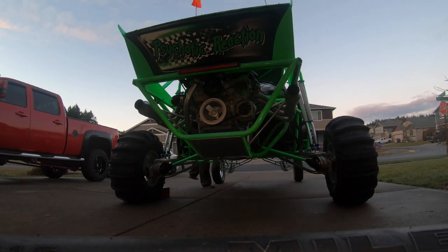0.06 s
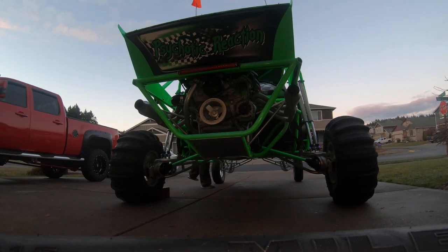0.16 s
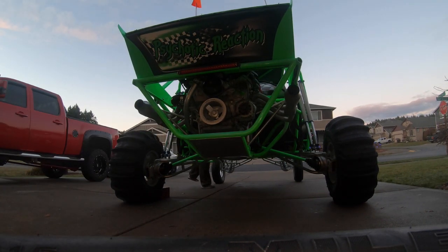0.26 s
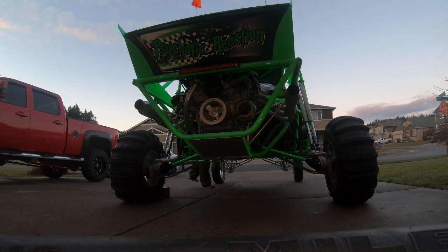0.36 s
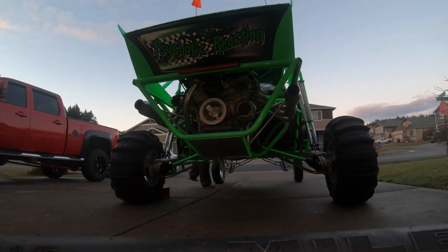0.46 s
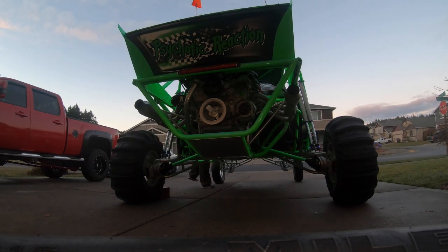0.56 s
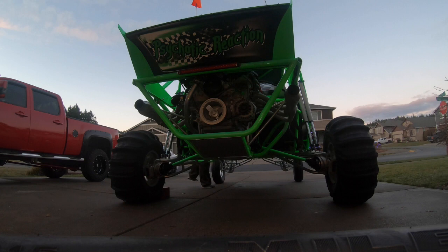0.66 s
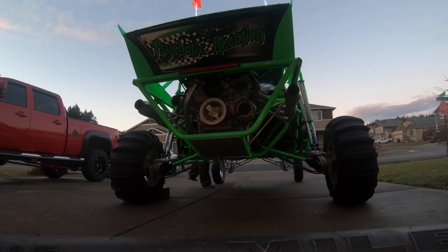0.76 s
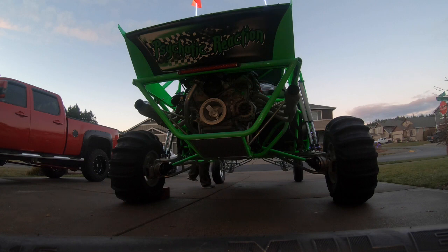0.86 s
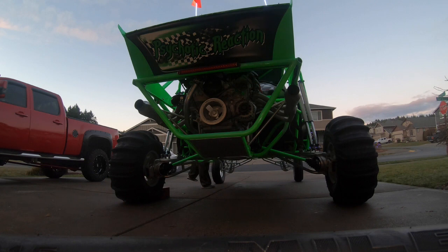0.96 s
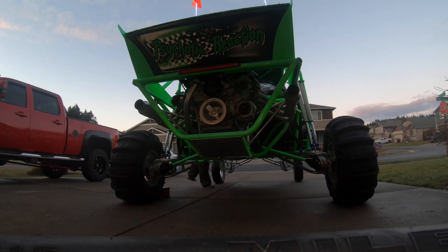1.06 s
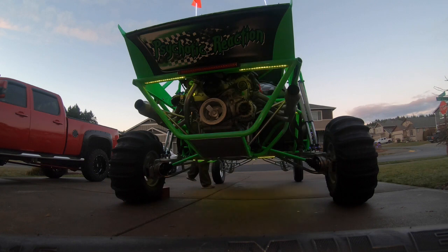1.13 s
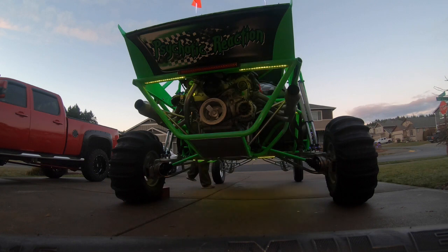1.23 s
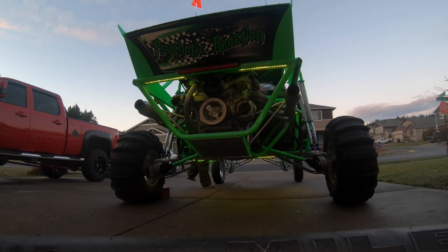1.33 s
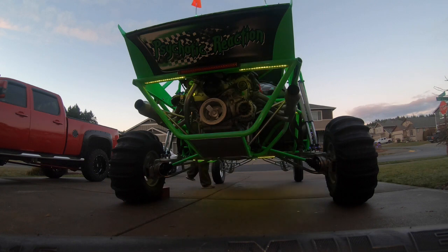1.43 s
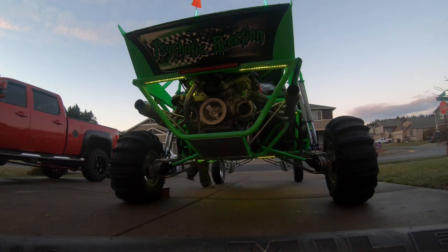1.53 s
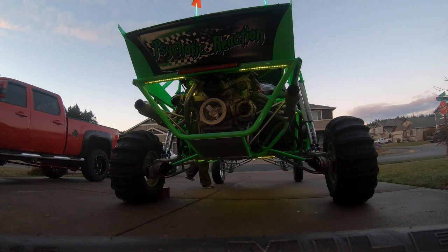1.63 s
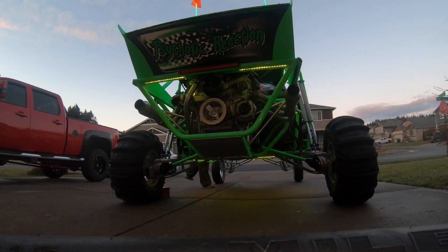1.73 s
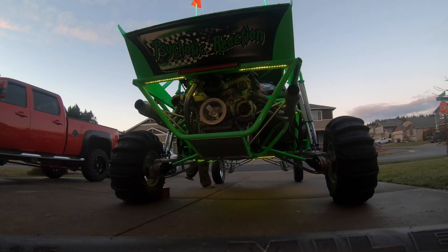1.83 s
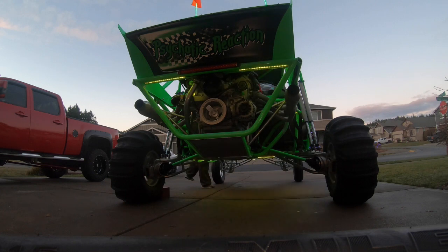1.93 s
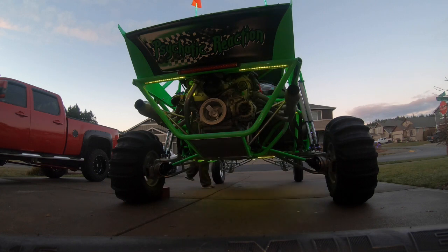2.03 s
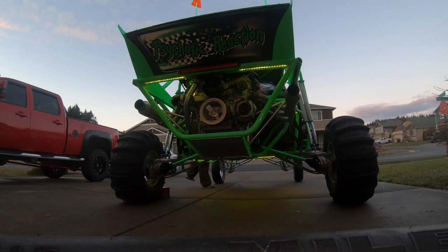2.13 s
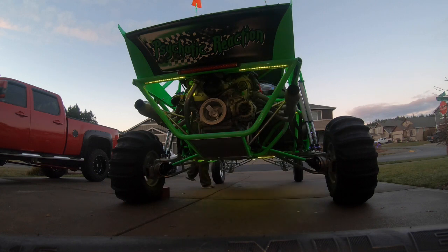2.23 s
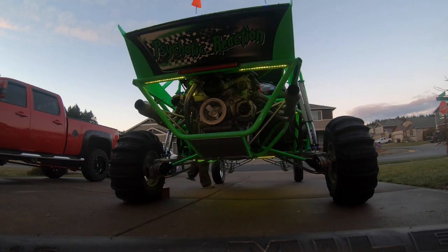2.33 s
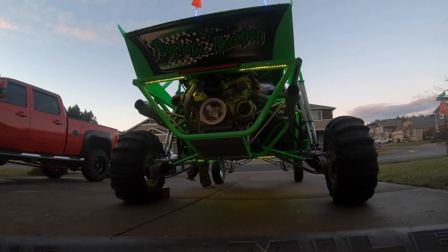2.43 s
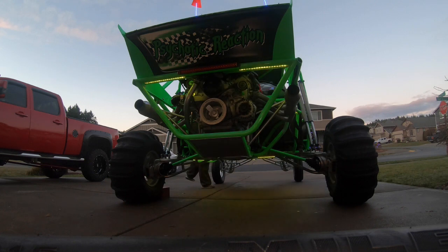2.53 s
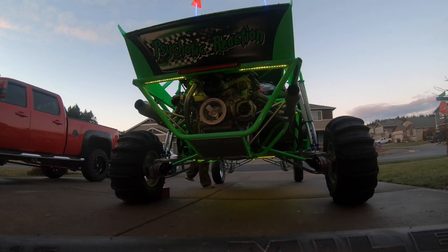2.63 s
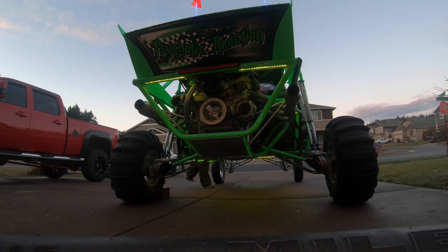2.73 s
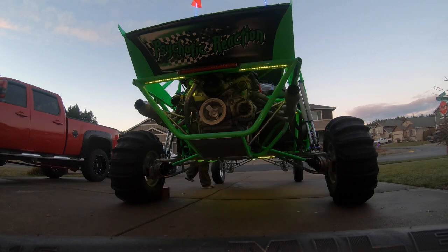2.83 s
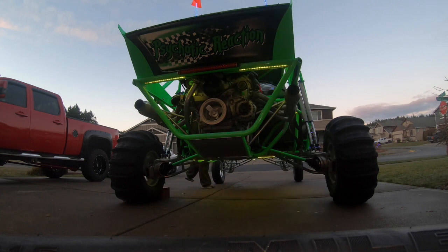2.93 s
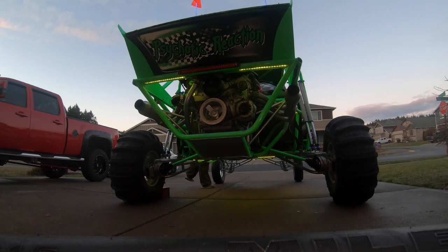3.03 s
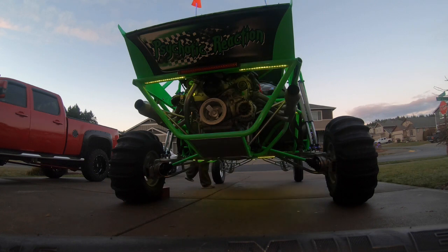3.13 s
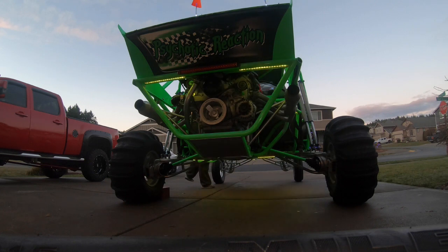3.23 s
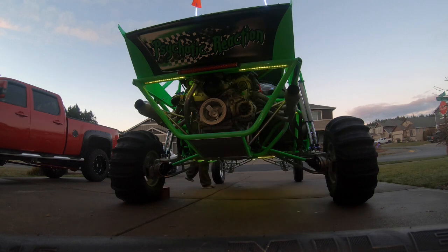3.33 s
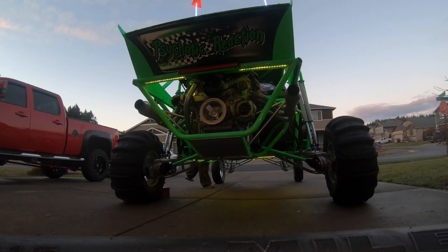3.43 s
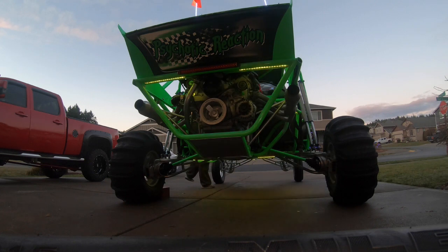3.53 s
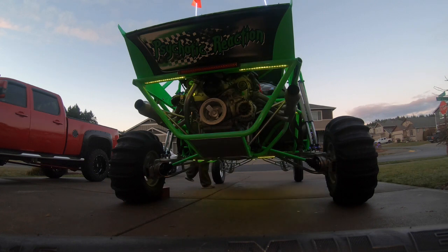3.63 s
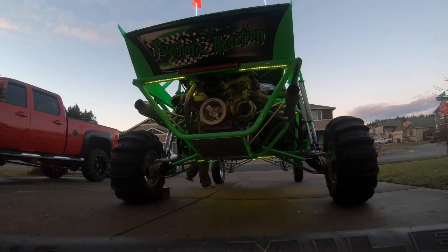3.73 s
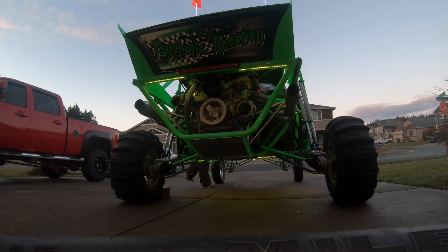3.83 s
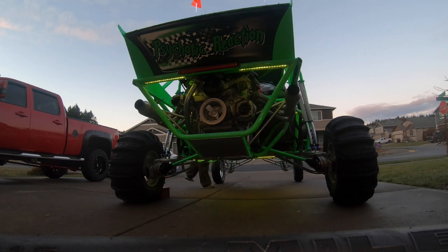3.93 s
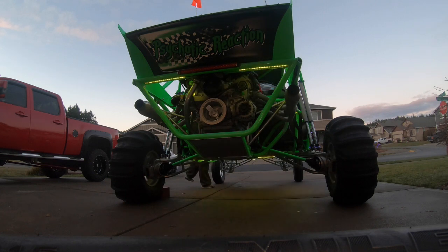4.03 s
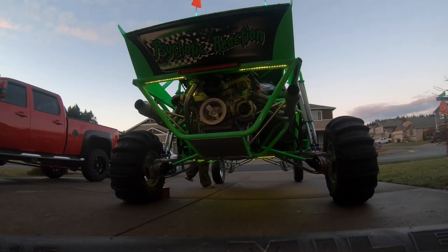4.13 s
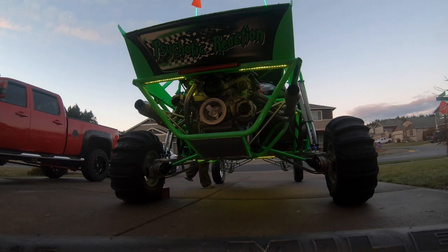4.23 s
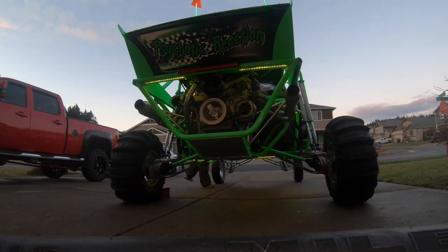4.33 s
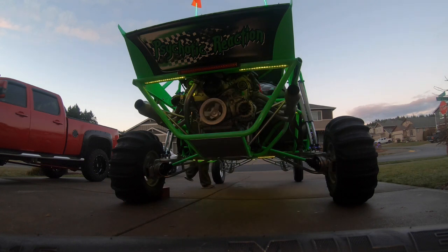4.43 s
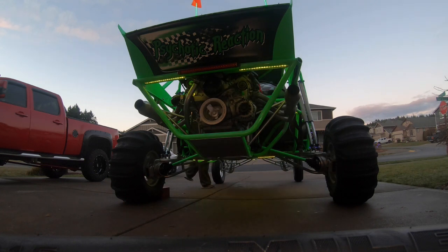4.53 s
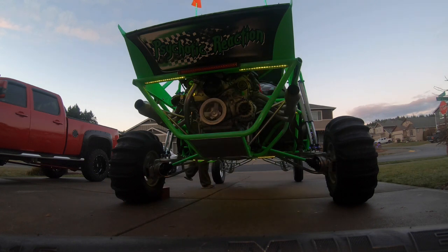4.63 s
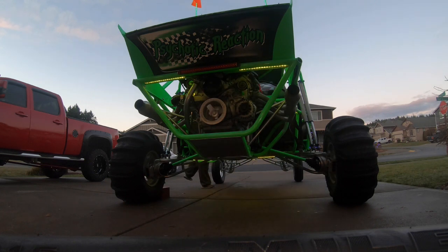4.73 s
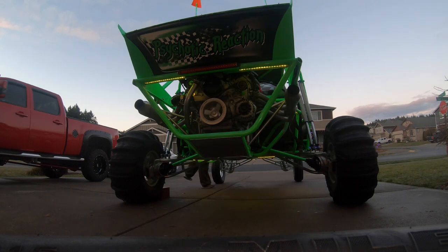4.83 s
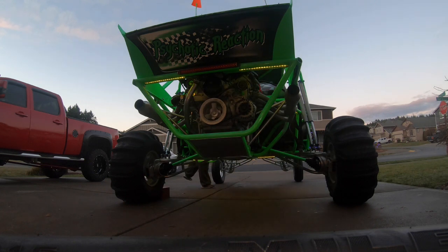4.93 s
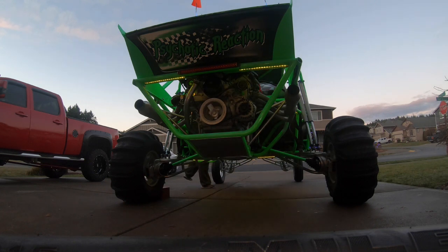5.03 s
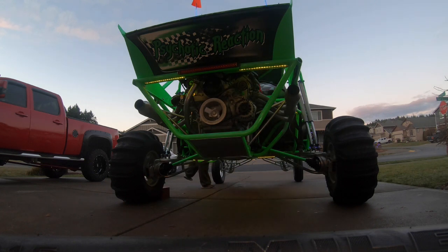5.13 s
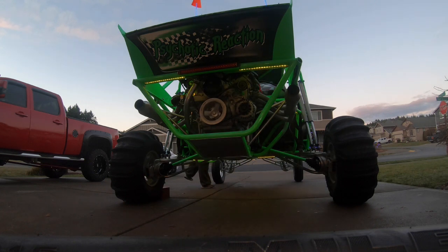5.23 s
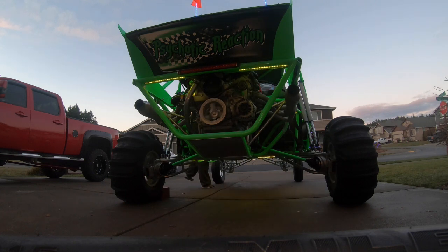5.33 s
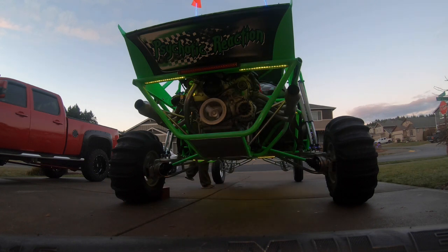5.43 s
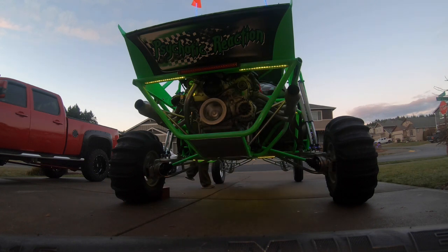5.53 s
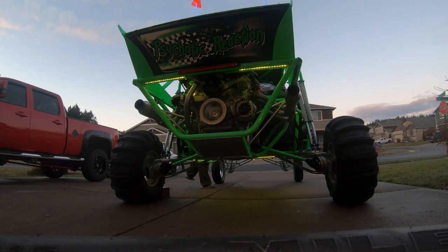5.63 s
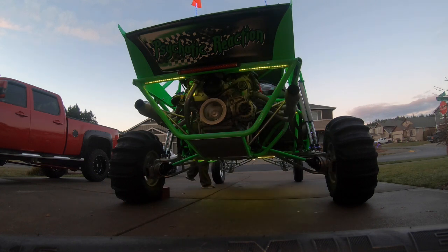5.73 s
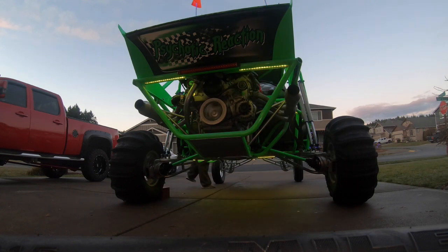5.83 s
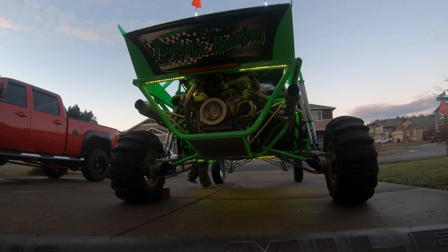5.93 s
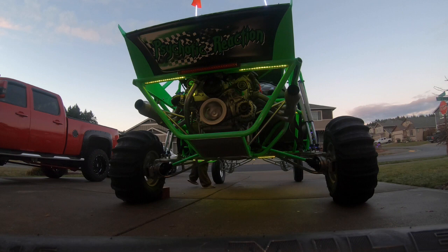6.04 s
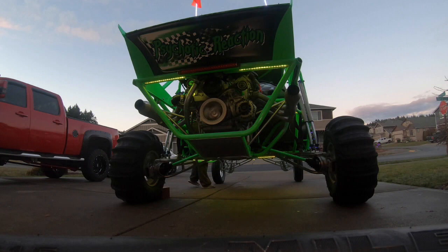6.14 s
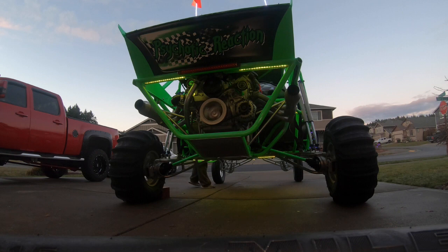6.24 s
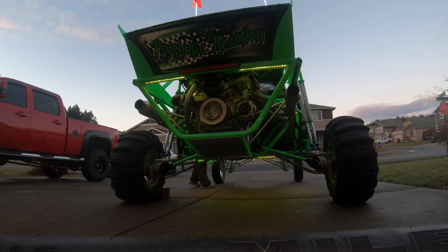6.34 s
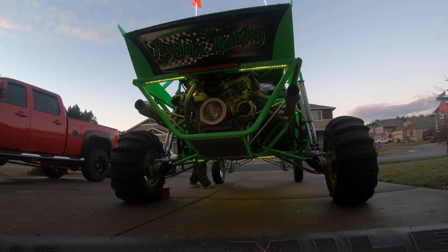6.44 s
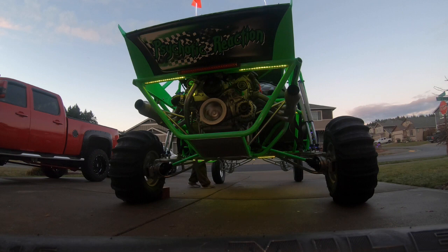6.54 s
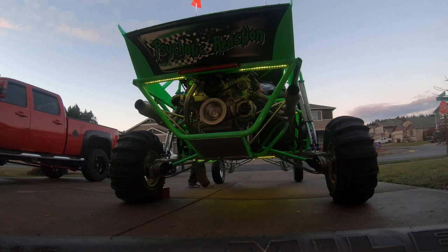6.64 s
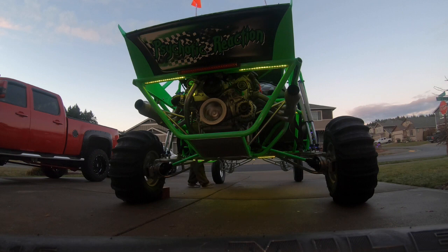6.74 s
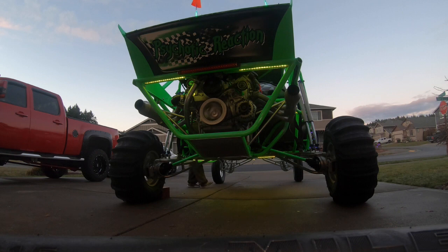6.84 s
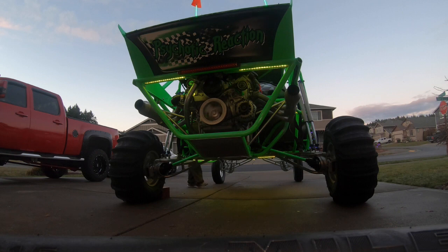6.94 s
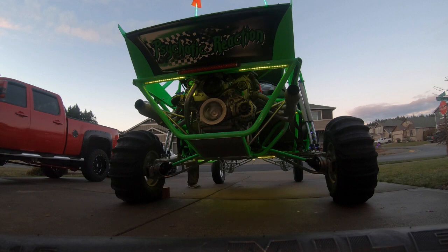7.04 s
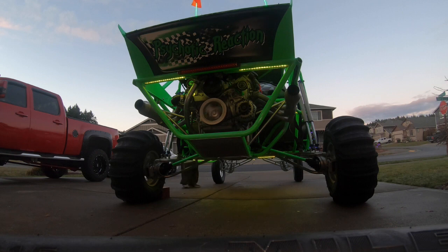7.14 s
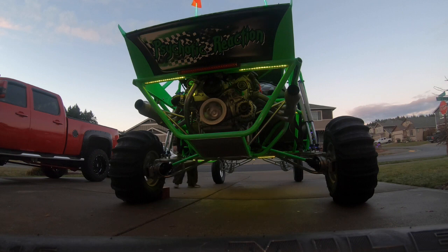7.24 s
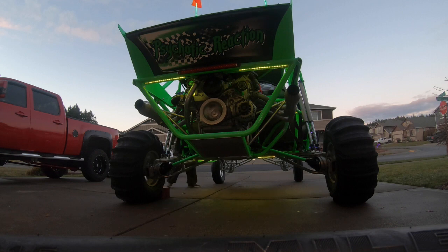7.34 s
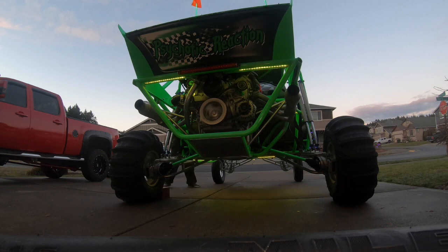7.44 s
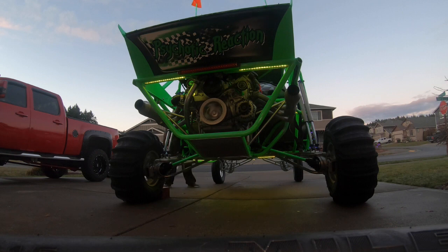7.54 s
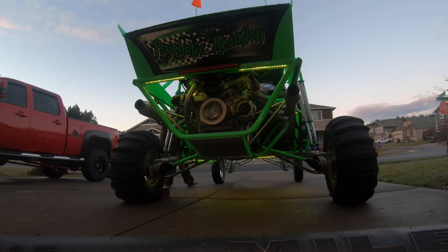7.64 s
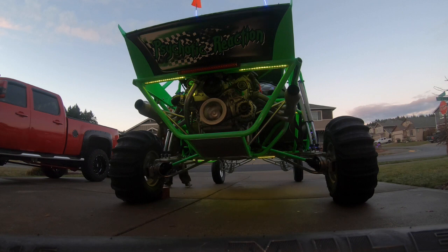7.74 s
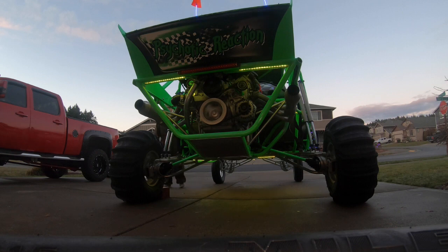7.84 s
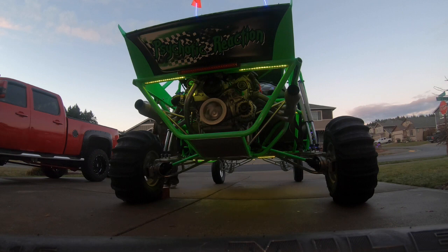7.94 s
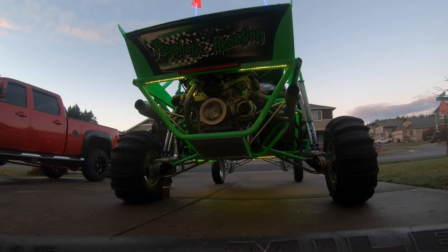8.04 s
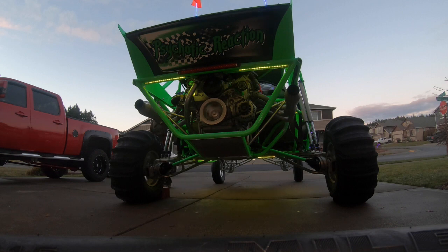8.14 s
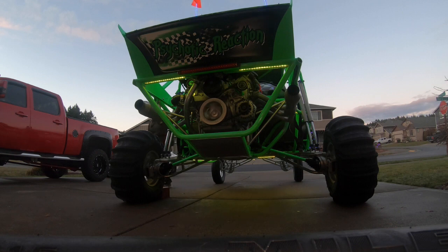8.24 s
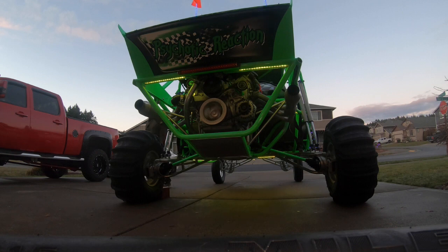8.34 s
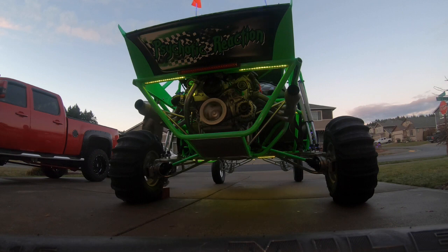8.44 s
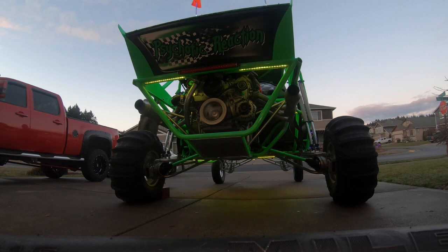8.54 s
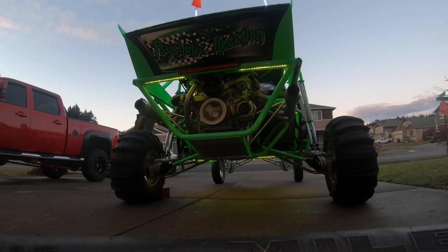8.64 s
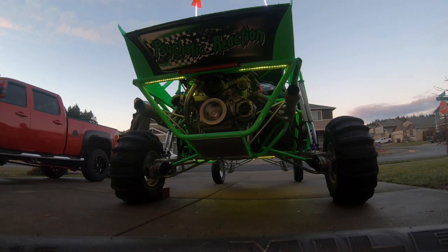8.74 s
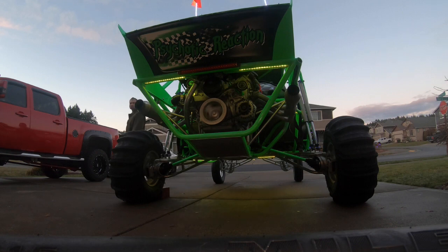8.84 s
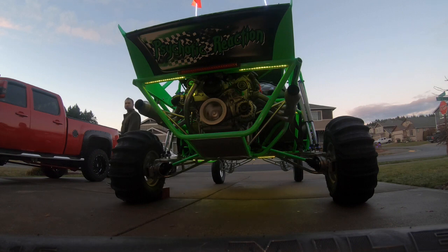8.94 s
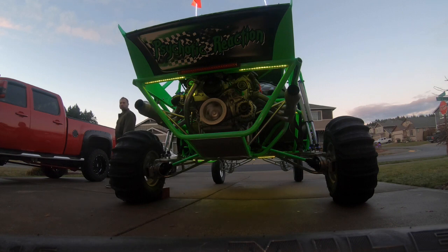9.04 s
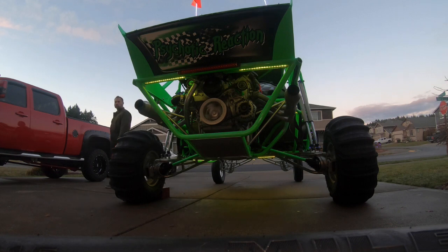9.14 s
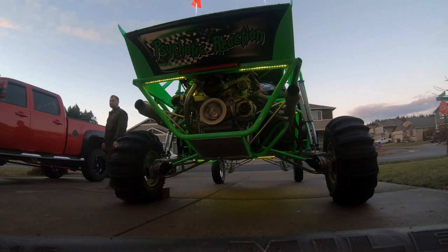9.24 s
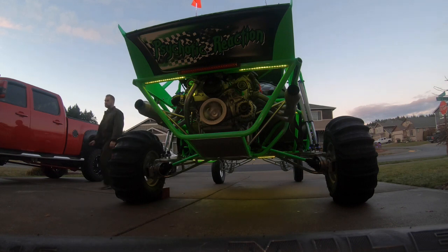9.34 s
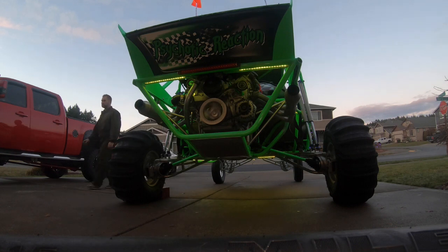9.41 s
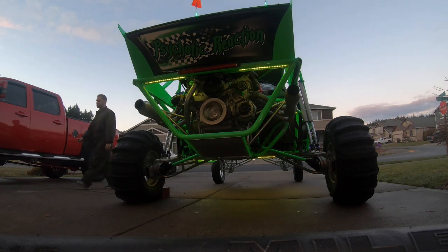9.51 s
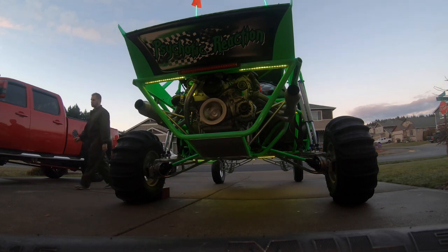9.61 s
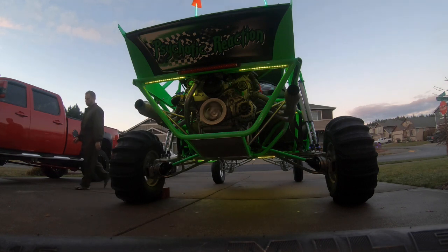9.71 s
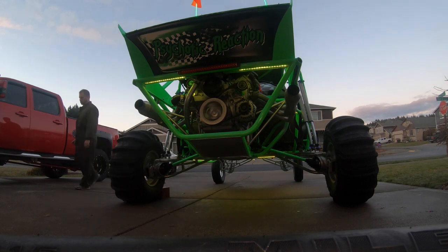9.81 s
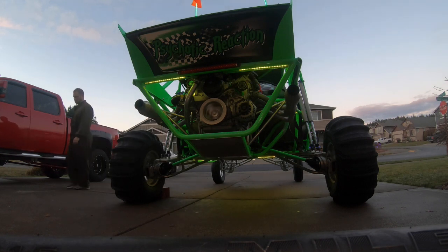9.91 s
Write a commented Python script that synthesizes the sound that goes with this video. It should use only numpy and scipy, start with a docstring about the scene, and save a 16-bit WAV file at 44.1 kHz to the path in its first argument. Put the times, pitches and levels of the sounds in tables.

```python
"""Starting a V8 sand buggy

An open-framed buggy is started on a driveway, a few metres away, over a faint rumble, hum and hiss.
Dashboard switches clack and a fuel pump whines; then the starter gear grinds on the flywheel.
The engine catches with sharp pops, flares once and settles into a booming, slowly hunting idle.
Tones make the boom and whines; shaped noise and ringing pulses make the gas, gears, clacks and one barking cylinder.
"""
import sys
import numpy as np
from scipy import signal
from scipy.fft import rfft, irfft, next_fast_len
from scipy.io import wavfile
from scipy.ndimage import uniform_filter1d

SR = 44100
rng = np.random.default_rng(int(sys.argv[2]) if len(sys.argv) > 2 else 0)


def log_audio(samples):
    """Write samples as a 16-bit WAV file to the path given in sys.argv[1]."""
    # one column per channel
    frames = np.atleast_2d(samples).T
    # limit to full scale, then quantise
    limited = np.clip(frames, -1, 1)
    pcm = np.round(limited * 32767).astype(np.int16)
    wavfile.write(sys.argv[1], SR, pcm)


N = 439677
T = np.arange(N) / SR  # time of each sample [s]


def undb(db):
    """Turn decibels into a gain."""
    return 10 ** (np.asarray(db) / 20)


def curves(table):
    """Draw straight lines between the rows of a time table, one curve for each column."""
    times, *columns = np.transpose(table)
    return [np.interp(T, times, column) for column in columns]


def gate(start, stop, fade):
    """One between two times, with straight ramps just inside them."""
    return np.clip((T - start) / fade, 0, 1) * np.clip((stop - T) / fade, 0, 1)


def ramp(start, length):
    """Zero until the start, then straight up to one."""
    return np.clip((T - start) / length, 0, 1)


def bump(centre, width):
    """A smooth rise and fall, one at the top."""
    return np.exp(-((T - centre) / width) ** 2)


def burst(start, t60):
    """A sudden start that dies away by 60 dB in t60 seconds."""
    return (T >= start) * np.exp(-np.log(1000) * np.clip((T - start) / t60, 0, 4))


def unit(x):
    """Scale to an average (rms) level of 1."""
    return x / np.sqrt(np.mean(x ** 2))


def steady(x, size=6000):
    """Hold the rms near 1 over a window of samples, keeping the quicker pulses."""
    power = np.abs(uniform_filter1d(x ** 2, size))
    return x / np.sqrt(power + 1e-4 * np.mean(x ** 2))


def noise():
    """White noise: every pitch equally strong."""
    return rng.standard_normal(N)


def walk(rate):
    """Random wander through `rate` points a second, rms 1; it stands still after 4096 points."""
    return unit(np.interp(T * rate, np.arange(4096), rng.standard_normal(4096)))


def colour(x, points, size=2 ** 19):
    """Filter through (Hz, dB) points without sounding ahead of time (minimum phase)."""
    hz, db = np.transpose(sorted(map(tuple, points)))
    f = np.maximum(np.fft.rfftfreq(size, 1 / SR), 1)
    log_gain = np.log(undb(np.interp(np.log(f), np.log(hz), db)))
    # folding the cepstrum forward in time gives the minimum phase
    cepstrum = irfft(log_gain)
    cepstrum[1:size // 2] *= 2
    cepstrum[size // 2 + 1:] = 0
    return irfft(rfft(x, size) * np.exp(rfft(cepstrum)))[:N]


def resonate(x, hz, width):
    """One resonance, gain 1 at its centre."""
    return signal.lfilter(*signal.iirpeak(hz, hz / max(width, 1), fs=SR), x)


def resonate_twice(x, hz, width):
    """The same resonance twice over, for steeper sides."""
    return resonate(resonate(x, hz, width), hz, width)


def strikes(turn):
    """A pulse at each whole turn, shared between two samples."""
    step = np.maximum(np.gradient(turn), 1e-9)
    stairs = np.floor(turn) + np.minimum(turn % 1 / step, 1)
    return np.diff(stairs, prepend=turn[0] // 1 + 1) * (step > 1e-8)


def scatter(x, t60, size=20000):
    """Dense reflections from frame, ground and house fronts, as a fading noise tail."""
    tail = rng.standard_normal(size) * undb(-60 * T[:size] / t60)
    return signal.fftconvolve(x, tail / np.linalg.norm(tail))[:N]


# just before the first firing: the hiss starts to sink, and the spit's hold is timed from here
SINK_START_S = 5.21
AIR_DB, SINK_DB = -47.5, -3.5  # background level, and its fall
# colour of the background: (pitch [Hz], relative level [dB])
AIR = [(18, -88), (30, -20), (71, -5.5), (113, 0), (158, -5.5), (176, -12), (211, -11.5), (355, -24),
       (837, -23.5), (1170, -29.5), (3410, -22.5), (5300, -25), (8250, -6.5), (10700, -30.5), (15000, -52)]


def background():
    """Shaped noise for a distant rumble and the microphones' hiss, plus a faint hum alike on both sides."""
    mid = colour(noise(), AIR)
    side = colour(colour(noise(), AIR), [(150, -9.5), (1000, 0.0), (4000, 0.0)])
    hum = undb(-73.5) * unit(resonate_twice(noise(), 318, 30))
    level_db = AIR_DB + SINK_DB * ramp(SINK_START_S, .5)
    return undb(level_db) * np.array([mid + side, mid - side]) / np.std(mid) + hum


RUSTLE_S, RUSTLE_WIDTH_S, RUSTLE_LOW_DB, RUSTLE_HIGH_DB = .845, 0.044, -52, -50.5


def rustle():
    """Someone shifts in the seat: a brief swell of low and high rubbing noise."""
    low = unit(resonate_twice(noise(), 320, 220))
    high = unit(resonate_twice(noise(), 3500, 3500))
    return bump(RUSTLE_S, RUSTLE_WIDTH_S) * (undb(RUSTLE_LOW_DB) * low + undb(RUSTLE_HIGH_DB) * high)


# whining tones of the fuel pump: (pitch [Hz], middle level [dB])
PUMP = [(317.6, -63), (339.1, -68), (409.1, -70), (1707, -74), (2051, -73), (2562, -69), (2902, -72),
        (3074, -70), (4274, -67), (4603, -75)]


def fuel_pump():
    """The pump builds pressure for about three seconds: wavering tones over rushing noise."""
    clock = T + 0.0012 * np.cumsum(walk(9)) / SR  # a slightly uneven speed
    tones = sum(undb(db + 3.3 * walk(30.8)) * np.sqrt(2) * np.sin(2 * np.pi * f * clock) for f, db in PUMP)
    flow = undb(-60.0) * unit(resonate(noise(), 2620, 3100))
    flow = flow + undb(-65.0) * unit(resonate_twice(noise(), 307, 87))
    growth = np.interp(T, [.75, 1.1, 2.3], [.3, .75, 1])
    return gate(.75, 3.8, .03) * growth * (tones + flow)


SWITCH_ATTACK_S = .005  # how long a switch takes to bite
THUMP_HZ, THUMP_WIDTH_HZ, THUMP_DB, THUMP_LAG_S = 138, 180, 0.5, 0.013
# switches and soft knocks, levels before the final mix of the parts: (time [s], clack level [dB],
# snap level above the clack [dB], snap pitch [Hz], panel level [dB], thump level [dB])
SWITCHES = [(0.629, -47.5, 3, 3880, -62, -68), (0.749, -45, -5, 3000, -51, -60),
            (1.047, -25, -17, 3700, -40, -41), (1.058, -29, -4, 1650, -36, -52),
            (1.239, -31, -8, 2900, -26.5, -36), (1.348, -29, 1, 3160, -31.5, -39),
            (1.404, -28.5, -18, 3100, -34, -43), (1.508, -29.5, -9, 3100, -31, -35.5),
            (1.526, -34.5, -5, 1350, -49, -44), (1.621, -31, -1, 3230, -29.5, -40),
            (1.664, -32, -10, 1900, -45, -35), (1.804, -48, -30, 3000, -43.5, -43),
            (1.93, -37, -22, 2900, -34, -41), (3.776, -44, -14, 3100, -51, -59)]
# ringing of the dashboard: (pitch [Hz], relative level [dB], time to fade by 60 dB [s])
PANEL = [(131, 0, .22), (181, -5, .2), (236, -4, .2), (379, -9, .12), (527, 3, .09), (651, -3, .05),
         (904, -6, .025), (1087, -6, .025), (1372, -6, .025), (1658, -7, .02), (2045, -8, .02)]
# colour of the clack: (pitch [Hz], relative level [dB])
CLACK = [(240, -48), (400, -7), (527, -5), (594, -13), (646, -10.5), (2620, -18), (3180, -24), (4550, -40),
         (7000, -22.5), (9100, -34), (15400, -120)]


def switches():
    """Each switch snaps at its own pitch, rattles and shakes the dashboard; a low thump follows."""
    clack, snap, thud, shake, grain = 0, 0, 0, 0, noise()
    for s, db, snap_db, snap_hz, panel_db, thump_db in SWITCHES:
        fade = burst(s, .1) + .45 * burst(s, .36)
        clack = clack + undb(db) * fade * ramp(s - .001, SWITCH_ATTACK_S)
        snap = snap + undb(db + snap_db) * burst(s, 0.16) * unit(resonate(grain, snap_hz, 230))
        thud = thud + undb(panel_db) * burst(s + 0.003, 0.35)
        late = s + THUMP_LAG_S
        shake = shake + undb(thump_db) * ramp(late, 0.012) * burst(late, 0.43)
    thump_noise = resonate_twice(noise(), THUMP_HZ, THUMP_WIDTH_HZ)
    thump = undb(THUMP_DB) * shake * steady(thump_noise, size=2000)
    push = thud * noise()
    # a longer ring means a narrower resonance
    panel = sum(undb(db) * np.sqrt(t60) * resonate(push, f, np.log(1000) / np.pi / t60) for f, db, t60 in PANEL)
    rattle = steady(colour(noise() * undb(3.5 * walk(260)), CLACK), size=900)
    return undb(-9.5) * clack * rattle + undb(-4.5) * snap + undb(25.0) * panel + thump


STROKE_ATTACK_S, STROKE_RELEASE_S = 0.0149, .05
# each compression loads the gear quickly and lets it go slack slowly: (time [s], lift [dB], hold [s])
COMPRESSIONS = [(4.43, 2.5, .07), (4.55, 3, 0.039), (4.643, 2.5, .04), (4.72, 4.5, .07), (4.861, 5, .055),
                (5.002, 6, 0.0193), (5.095, 6, 0.037), (5.185, 6, 0.067)]


def compressions():
    """Lift of the gear noise in dB: the load of each stroke rises, holds and lets go."""
    lifts = []
    for s, db, hold in COMPRESSIONS:
        release = ramp(s + STROKE_ATTACK_S + hold, STROKE_RELEASE_S)
        lifts.append(db * ramp(s, STROKE_ATTACK_S) * (1 - release))
    return np.max(lifts, axis=0)


SLAM_S, SLAM_DB, SLAM_T60_S = 4.384, -12, 0.13  # the pinion slams into the ring gear
TONE_WIDTH_S, TONE_SAG_PER_S = 0.016, 0.43  # width, and share of the pitch lost per second
# the chirp starts high and drops to a fading tone
RUNOUT_S, RUNOUT_HZ, RUNOUT_DROP_HZ, RUNOUT_DROP_S, RUNOUT_DB, RUNOUT_T60_S = 5.358, 1556, 260, .011, -17.5, 0.2
# short tones where the gear whine rings the housing: (time [s], pitch [Hz], level [dB])
HOUSING_TONES = [(4.402, 1225, -25), (4.665, 1370, -25), (4.69, 1796, -29), (4.741, 2440, -28),
                 (4.807, 1795, -29), (4.884, 1296, -30), (5.142, 1284, -24), (5.23, 1310, -24.5)]


def housing_tones_and_chirp():
    """Short sagging tones where the gear whine rings the housing; the pinion chirps as it is thrown out."""
    waver = .5 * walk(250)
    tones = 0
    for s, f, db in HOUSING_TONES:
        sagging = (T - s) * (1 - TONE_SAG_PER_S * (T - s) / 2)
        tones = tones + undb(db) * np.sqrt(2) * bump(s, TONE_WIDTH_S) * np.sin(2 * np.pi * f * sagging + waver)
    hz = RUNOUT_HZ + RUNOUT_DROP_HZ * np.exp(-np.maximum(T - RUNOUT_S, 0) / RUNOUT_DROP_S)
    chirp = np.sin(2 * np.pi * np.cumsum(hz) / SR + waver)
    runout = undb(RUNOUT_DB) * ramp(RUNOUT_S, .008) * burst(RUNOUT_S, RUNOUT_T60_S) * chirp
    return ramp(SLAM_S, .01) * tones + runout


GEAR_DB, GEAR_EASE_DB_PER_S = -21.5, 6.5  # gear noise between strokes eases as the engine frees up
STROKE_SAG = .035  # share of the speed between slack and the strongest stroke
PUMPING_DB, CHUFF_S = -30.5, 0.022  # steady level of the pumped air; width of a chuff
# the starter spins up, bogs down about a quarter second in and recovers:
# (time [s], middle tooth rate [Hz])
MESH = [(4.38, 649.3), (4.45, 890), (4.5, 965), (4.575, 1050), (4.605, 895.7), (4.645, 685), (4.7, 715.4),
        (4.795, 914.6), (4.97, 931), (5.28, 1075), (5.37, 1070)]
# colour of the bell housing: (pitch [Hz], relative level [dB])
HOUSING = [(210, -67), (350, -13.5), (544, -15), (646, 6.5), (768, -12), (899, 1.5), (1160, -6.5),
           (1310, 2.5), (1580, -5), (1740, 0.5), (3370, -10), (3760, -2.5), (4760, -11.5), (8380, -15),
           (15000, -93)]
# ringing of the bell housing: (pitch [Hz], width [Hz], middle relative level [dB])
RINGS = [(649, 24, 6), (890, 35, 9), (1290, 60, 4), (1770, 42, 1.5), (2046, 42, 1), (2440, 44, 4),
         (2690, 90, 4), (2875, 55, 4), (3700, 110, 2), (3900, 81, -3)]
# whine of the gears: (multiple of the tooth rate, middle relative level [dB])
WHINE = [(1, 3), (1.4, -11), (2, -8), (2.4, -10), (3, -8), (4, -8)]
# colour of the pumped air: (pitch [Hz], relative level [dB])
PUMPING = [(18, -46), (30, -15.5), (70, 8), (116, -1.5), (162, -17.5), (270, -4), (303, -21), (393, -29),
           (450, -21.5), (580, -35), (990, -120)]
# strong chuffs of pumped air: (time [s], lift [dB])
CHUFFS = [(4.42, 7.8), (4.6, 3.1), (4.76, 3.2), (5.08, 6.1), (5.33, 4.4)]


def starter():
    """The pinion slams in; its teeth clash and ring the housing while the cylinders pump air."""
    hz, = curves(MESH)
    stroke_db = compressions()
    gear_db = GEAR_DB - GEAR_EASE_DB_PER_S * (T - MESH[0][0]) + stroke_db
    hz = hz * (1 + STROKE_SAG * (.5 - stroke_db / np.max(stroke_db)))
    turn = np.cumsum(hz * (1 + .024 * walk(160))) / SR
    # backlash makes each tooth land early or late; the pinion's turn makes the grind pulse
    landing = turn + .08 * walk(700)
    grind = undb(2 * walk(350) + 2 * np.sin(2 * np.pi * turn / 5))
    clash = strikes(landing) * grind * undb(0.97 * walk(700))
    teeth = unit(clash) + 4.4 * unit(noise() * grind)
    rings = sum(undb(db + 4.3 * walk(22)) * resonate(teeth, f, width) for f, width, db in RINGS)
    rings = colour(rings, [(300, -15), (600, 0), (4200, 0), (8500, -5), (11000, -24), (15000, -36)])
    whine = sum(undb(db + 4 * walk(28)) * np.sin(2 * np.pi * k * turn + .6 * walk(300)) for k, db in WHINE)
    # the frame's reflections break the whine into flutters; it sings most while the cold engine drags
    whine = steady(whine + .8 * scatter(whine, .07), size=1500)
    sing_db = np.interp(T, [4.4, 4.6, 4.8, 4.87, 5.22, 5.3], [-1, 3, 1, -5, -6, -2])
    gears = unit(colour(teeth, HOUSING)) + undb(-6) * unit(rings) + undb(sing_db) * unit(whine * grind)
    meshed = gate(4.372, 5.39, 0.02) ** 2
    gears = meshed * undb(gear_db) * steady(gears, size=1200)
    slam_shape = ramp(SLAM_S - .003, 0.018) * burst(SLAM_S, SLAM_T60_S)
    slam = undb(SLAM_DB) * slam_shape * unit(colour(noise(), HOUSING))
    slam = slam + undb(-32.5) * burst(SLAM_S + 0.014, 0.35) * unit(resonate(noise(), 230, 160))
    pump_db = PUMPING_DB + sum(db * bump(s, CHUFF_S) for s, db in CHUFFS)
    pumping = steady(colour(noise() * undb(4.5 * walk(25)), PUMPING), size=3000)
    pumping = gate(4.395, 7.1, 0.04) * undb(pump_db) * pumping
    return pumping + gears + slam + housing_tones_and_chirp()


TICK_DB, TICK_SPREAD_DB, TICK_T60_S = -50, 5.5, .028  # lesser ticks: middle level, spread; fade of all
HARD_TICK_DB = -5  # trim of the hard ticks
# hardest ticks of the valve gear: (time [s], level before the trim [dB])
TICKS = [(5.948, -24.5), (5.976, -27), (6.021, -22.5), (6.19, -26), (6.2255, -26.5), (6.5708, -31),
         (6.7349, -27.5), (7.1125, -33), (7.168, -25), (7.4408, -25.5), (7.5834, -30), (7.6323, -32),
         (7.8364, -32.5), (8.6006, -31.5), (8.7014, -30), (8.714, -30), (8.99, -28), (9, -28),
         (9.2096, -31), (9.2953, -33), (9.308, -27), (9.4058, -30), (9.756, -36), (9.7942, -28)]
# ringing of the ticks: (pitch [Hz], width [Hz], middle relative level [dB])
ROCKERS = [(5500, 1300, 0.5), (7030, 1400, 0.5), (8620, 1700, 2), (10340, 2600, -10.5), (13000, 1900, -19)]


def valves(turn):
    """Valves tick onto their seats in loose clusters, a few much harder; the ringing keeps changing."""
    size_db = TICK_DB + np.minimum(TICK_SPREAD_DB * walk(170) + 3 * walk(9), 11)
    seats = strikes(turn + .85 + .3 * walk(90)) * undb(size_db) * gate(5.4, 11, .05)
    light = signal.lfilter([1], [1, -undb(-60 / TICK_T60_S / SR)], seats)  # each pulse fades away
    hard = sum(undb(db + HARD_TICK_DB) * burst(s, TICK_T60_S) for s, db in TICKS)
    metal = sum(undb(db + 4 * walk(60)) * unit(resonate_twice(noise(), f, width)) for f, width, db in ROCKERS)
    return (light + hard) * unit(metal)


# the idle sinks slowly and hunts around its mean; IDLE_HZ is the mean at the crest HUNT_CREST_S
IDLE_HZ, IDLE_SAG_HZ_PER_S, SETTLE_S = 85.95, 2.513, .747
HUNT_HZ, HUNT_PERIOD_S, HUNT_CREST_S = 1.748, 1.152, 7.078
# crankshaft from the first firing to the end of the flare: (time [s], firings per second [Hz])
FLARE = [(5.3, 63.12), (5.502, 79.17), (5.603, 71.14), (5.82, 116.63), (5.929, 122.6), (6.075, 91.35),
         (6.389, 75.68)]


def crankshaft():
    """Firing rate: one flare, then a hunting idle; also how far the idle has settled, 0-1."""
    flare, = curves(FLARE)
    since = T - HUNT_CREST_S
    idle = IDLE_HZ - IDLE_SAG_HZ_PER_S * since + HUNT_HZ * np.cos(2 * np.pi * since / HUNT_PERIOD_S)
    settled = ramp(FLARE[-1][0], SETTLE_S)
    return flare + settled * (idle - flare), settled


PULL_S, COAST_S = 5.677, 5.96  # the engine pulls hardest, then coasts with the throttle shut
BOOM_DB, BOOM_COLD_DB, BOOM_RISE_S = -13.5, -6, .05  # idle level; the first firings are weaker
PULL_DB, PULL_WIDTH_S, COAST_DB, COAST_WIDTH_S = -0.5, .06, -5.5, 0.14  # boom change at each time
MISFIRE_S = 0.0097  # width of a dip
HICCUP_S, HICCUP_DB = 5.8, 10  # one extra hard bark during the flare
BLAT_DB, BLAT_RISE_DB_PER_S, BLAT_FALL_DB_PER_S = -20, 68, 46  # peaks at the hardest pull
# gas rush: idle level, extra during the start, time for that to go, and how it follows the speed
GAS_DB, GAS_START_DB, GAS_RELEASE_S, GAS_DB_PER_HZ = -34, 11.5, 0.4, 0.18
# sharp spit of the cold exhaust: held at first, then fading towards its idle level
SPIT_DB, SPIT_COLD_DB, SPIT_HOLD_S, SPIT_FADE_S = -51.5, 27.5, 0.075, 0.88
# firings that come weak or fail, so that the boom drops out: (time [s], level change [dB])
MISFIRES = [(5.354, -16), (5.452, -7), (5.87, -4.5), (5.94, -5.5), (6.01, -3), (6.246, -5), (9.208, -5)]
# strength of the barking cylinder, which comes and goes: (time [s], level [dB])
LOPE = [(6.3, -31), (6.7, -31.5), (6.85, -26), (7.15, -25.5), (7.7, -25), (8.05, -24), (8.17, -26),
        (8.45, -24), (8.65, -27), (8.75, -28.5), (8.86, -28), (8.95, -25.5), (9.25, -25.5), (9.62, -26.5),
        (9.73, -28.5), (9.95, -29.5)]


def exhaust_levels(hz, settled):
    """Boom, bark, blat, gas and spit in dB, shaped by pulling, coasting, misfires and engine speed."""
    boom = BOOM_DB + BOOM_COLD_DB * np.exp(-np.maximum(T - FLARE[0][0], 0) / BOOM_RISE_S)
    boom = boom + PULL_DB * bump(PULL_S, PULL_WIDTH_S) + COAST_DB * bump(COAST_S, COAST_WIDTH_S)
    boom = boom + sum(db * bump(s, MISFIRE_S) for s, db in MISFIRES)
    bark = curves(LOPE)[0] + HICCUP_DB * bump(HICCUP_S, 0.02)
    blat = BLAT_DB - np.maximum(BLAT_RISE_DB_PER_S * (PULL_S - T), BLAT_FALL_DB_PER_S * (T - PULL_S))
    released = ramp(PULL_S, GAS_RELEASE_S)
    surge_hz = (np.minimum(hz, IDLE_HZ) - np.mean(hz[settled == 1])) * released
    gas = GAS_DB + GAS_START_DB * (1 - released) + GAS_DB_PER_HZ * surge_hz
    spit = SPIT_DB + SPIT_COLD_DB * np.exp(-np.maximum(T - SINK_START_S - SPIT_HOLD_S, 0) / SPIT_FADE_S)
    return boom, bark, blat, gas, spit


# unburnt charges that pop as the engine catches: (time [s], level before a 9 dB cut [dB],
# time to fade by 60 dB [s])
POPS = [(5.3608, -11.5, 0.23), (5.4034, -8.5, .12), (5.474, -9, 0.15), (5.4985, -14, 0.2),
        (5.549, -9, 0.16), (5.5893, -12.5, 0.093), (5.604, -11, .08), (5.6194, -19, .05),
        (5.6451, -12, 0.037), (5.6583, -5.5, 0.034), (5.6806, -11.5, 0.035), (5.712, -8, .04),
        (5.7326, -9.5, 0.027), (5.7615, -13.5, 0.025), (5.7903, -18, 0.033)]
# colour of the pops, also of the rasp under load: (pitch [Hz], relative level [dB])
POP = [(240, 1.5), (400, -16), (567, -18), (768, -2), (1370, 2.5), (1500, -4), (1770, 1), (2920, -2),
       (8560, -4), (15000, -36)]


def exhaust_pops():
    """Unburnt charges go off in the exhaust: sudden bursts of coloured noise."""
    crackle = steady(colour(noise() * undb(3 * walk(900)), POP), size=500)
    return sum(undb(db - 9.0) * burst(s, t60) for s, db, t60 in POPS) * crackle


# cylinders in firing order: (push above or below the even flow, gas puff [dB], boom [dB]),
# each before the load and chance that vary it
CYLINDERS = [(-0.049, -9, 0.8), (-0.19, 3, 1.5), (-0.084, -0.5, 1.5), (0.052, -16, 1), (0.44, -1.5, 1),
             (-0.073, -15.5, 0.5), (0.21, -2.5, 1), (-0.11, -0.5, 2.5)]
# tailpipe resonances: (pitch [Hz], width [Hz], relative level [dB])
TAILPIPE = [(118.6, 46, 7), (181, 35, -0.5), (304, 54.4, 5), (479, 59, -7), (645.7, 24, -6.5)]
# colour of the turbulence in the pipes: (pitch [Hz], relative level [dB])
PIPE = [(30, -11), (48, -14), (75, 4.5), (115, 1), (145, 15.5), (165, 3), (185, 10.5), (235, 7), (300, 2.5),
        (340, -24), (400, -15), (490, 0), (570, -36), (650, -18), (800, -52), (1500, -70.5)]
# colour of the blat under load: (pitch [Hz], relative level [dB])
BLAT = [(60, -12), (140, 3.5), (230, 2.5), (330, -6.5), (480, -6.5), (900, -24.5), (2500, -42.5)]
# colour of the rushing gas: (pitch [Hz], relative level [dB])
GAS = [(240, -34), (400, -3.5), (428, -11.5), (490, -4), (588, -5), (644, -2.5), (855, -7), (1270, -7.5),
       (1510, -12), (1650, -10), (1910, -15), (4130, -17.5), (4680, -16), (5060, -20.5), (6000, -22),
       (7800, -49), (13200, -120)]
# colour of the spit: (pitch [Hz], relative level [dB])
SPIT = [(2350, -18), (4000, -7), (8740, 5), (10700, -10), (14200, -14), (15500, -47)]


def engine():
    """Even firings merge into a boom; unequal cylinders ring the pipes; each firing puffs gas."""
    hz, settled = crankshaft()
    boom_db, bark_db, blat_db, gas_db, spit_db = exhaust_levels(hz, settled)
    turn = np.cumsum(hz * (T > FLARE[0][0])) / SR  # one whole turn per firing
    count, phase = turn.astype(int), turn % 1
    push, puff_db, swell_db = np.transpose(CYLINDERS)[:, count % len(CYLINDERS)]
    chance = rng.standard_normal((1000, 4))[count].T  # four random values for each firing
    load = np.interp(T, [5.8, 6.15], [1, 0])
    swell = uniform_filter1d(undb(swell_db + (0.76 + 2.0 * load) * chance[0]), size=400)
    boom = swell * np.sqrt(2) * np.cos(2 * np.pi * (turn + 0.14 + 0.013 * walk(35)))
    # one cylinder barks once a cycle, with a gust of turbulence behind it
    firings = strikes(turn) * undb(.7 * chance[1])
    uneven = firings * (push + .05 * chance[2])
    ring = sum(undb(db) * resonate_twice(uneven, f, width) for f, width, db in TAILPIPE)
    gust = np.abs(push) * np.exp(-phase / .8) + .33
    pipe = steady(ring, size=9000) + undb(-8) * unit(colour(noise() * gust, PIPE))
    # under load every cylinder fires hard and the gas rasps
    blat = steady(colour(firings * undb(2.3 * chance[2]), BLAT))
    blat = blat + undb(6.5) * unit(colour(noise() * np.exp(-phase / 0.23), BLAT))
    bark = undb(bark_db) * (1 - 0.5 * load) * pipe + undb(blat_db) * blat
    puff = undb(puff_db * (1 - .7 * load) + 1.8 * chance[3]) * np.exp(-phase / .3)
    flow = noise() * (puff + 1.34 + .5 * gust)
    roar = unit(resonate_twice(flow, 1210, 900))
    gas = steady(unit(colour(flow, GAS)) + undb(-23.0) * roar)
    rasp = steady(colour(noise() * (puff + .3), POP))
    spit = steady(colour(noise() * (puff + 0.46), SPIT))
    highs = undb(gas_db) * (gas * (1 - 0.4 * load) + 0.86 * load * rasp) + undb(spit_db) * spit
    # the first firings come as separate coughs; the steady rush builds up behind them
    rush = np.interp(T, [5.35, 5.37, 5.53, 5.62], [0, .4, .5, .85])
    lows = gate(FLARE[0][0], 11, 0.021) * (undb(boom_db) * boom + bark)
    return lows + rush * highs + exhaust_pops() + valves(turn)


# width of the sound: (pitch [Hz], level of the reflections put in the side signal [dB])
WIDTH = [(300, -21.5), (550, -10), (1000, -4.5), (2000, -7), (4000, -10.5), (8000, 0.5)]


def scene():
    """The buggy straight ahead; reflections widen its upper range."""
    buggy = engine() + starter() + switches() + rustle() + fuel_pump()
    bass = signal.sosfiltfilt(signal.butter(4, 260, fs=SR, output="sos"), buggy)
    upper = buggy - bass
    mid = buggy + undb(-11) * scatter(colour(upper, [(350, -12), (600, 0)]), .16)
    # the two microphones hear the bass slightly out of step: add some of it a quarter cycle late
    late_bass = signal.hilbert(bass, next_fast_len(N)).imag[:N]
    side = colour(scatter(upper, 0.32), WIDTH) + undb(-19.0) * late_bass
    # the first channel is a little quieter, less so from 5.5 s on
    lean_db = np.interp(T, [5.2, 5.5], [-1.8, -.5])
    return (np.array([mid + side, mid - side]) + background()) * undb(np.array([lean_db, -lean_db]) / 2)


TOP_HZ = 15600  # highest pitch let through


def record(dry):
    """The microphones' electronics round the highest peaks and cut the top of the treble."""
    rounded = dry / (1 + (dry / .85) ** 6) ** (1 / 6)
    return signal.sosfilt(signal.ellip(8, .2, 70, TOP_HZ, fs=SR, output="sos"), rounded)


dry = scene()
out = record(dry)
log_audio(out)
```